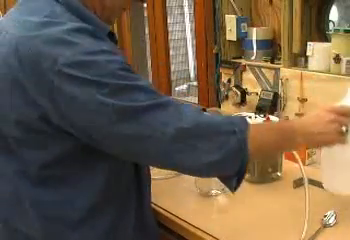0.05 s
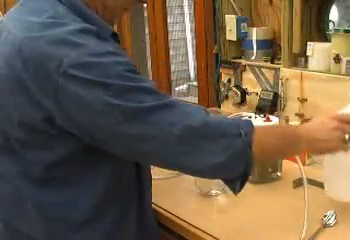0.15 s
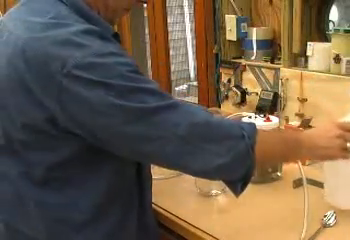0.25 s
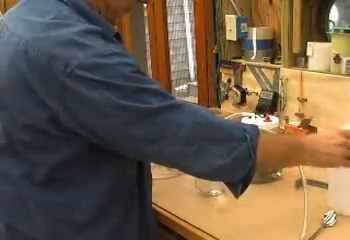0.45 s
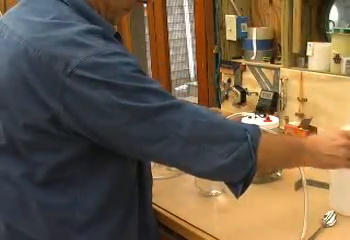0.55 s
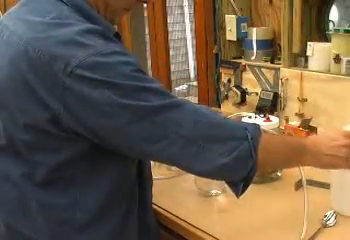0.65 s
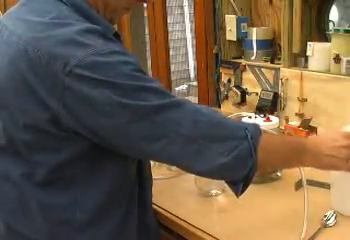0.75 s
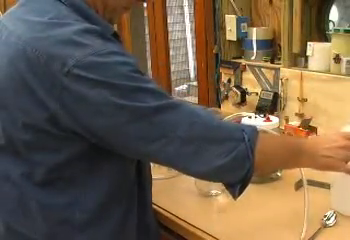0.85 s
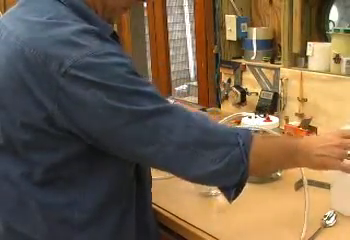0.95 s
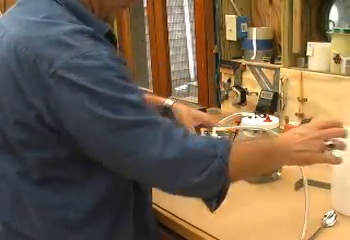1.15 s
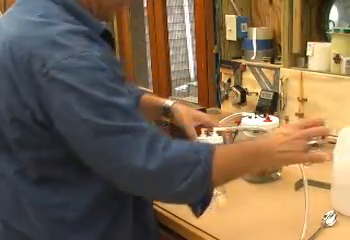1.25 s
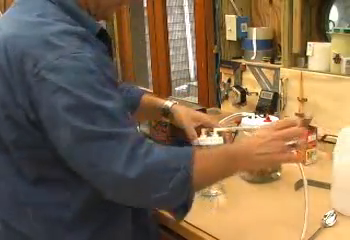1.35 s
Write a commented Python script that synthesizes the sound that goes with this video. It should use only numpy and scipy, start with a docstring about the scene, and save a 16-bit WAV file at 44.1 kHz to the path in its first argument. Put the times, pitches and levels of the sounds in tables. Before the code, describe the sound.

One hard, hollow knock sounds as a plastic jug lands on a workbench, just after a short scrape. The bench and jars ring briefly in a small workshop, then faint shuffling and finger ticks follow over low hiss.

```python
"""Over the quiet hiss and hum of a small workshop, hands tick lightly. A plastic jug scuffs on a wooden
workbench, its base rubbing and squeaking as it sticks and slips. The sound drops out for a moment.
The jug lands with a hollow thud, then a hard, bouncing knock rings the bench and the jars on it and
echoes round the room. The jug shuffles to rest with soft hollow notes, and hands tick a few more times."""
import sys
import numpy as np
from scipy import signal
from scipy.fft import rfft, irfft
from scipy.io import wavfile
from scipy.ndimage import uniform_filter1d

SR = 44100
rng = np.random.default_rng(int(sys.argv[2]) if len(sys.argv) > 2 else 0)


def unload_wav(signal):
    """Save mono or channel-first audio to the path in sys.argv[1] as 16-bit WAV at rate SR, clipped to [-1, 1]."""
    wavfile.write(
        sys.argv[1],
        SR,
        np.round(np.clip(np.atleast_2d(signal).T, -1, 1) * 32767).astype(np.int16),
    )


N = 61739
T = np.arange(N) / SR
FREQS = np.maximum(np.fft.rfftfreq(N, 1 / SR), 1)


def gain(db):
    """Turn decibels into a number to multiply by."""
    return 10 ** (np.asarray(db) / 20)


def unit(x):
    """Scale a sound to an average power of 1."""
    return x / np.sqrt(np.mean(x ** 2))


def curve(points):
    """Join (pitch_hz, level_db) points into a level for every frequency."""
    pitch_hz, level_db = np.array(points).T
    return np.interp(np.log(FREQS), np.log(pitch_hz), level_db)


def colour(x, db):
    """Turn each frequency up or down by its own number of decibels."""
    cepstrum = irfft(np.log(gain(db)), N)
    cepstrum[1:] *= 2 * (np.arange(1, N) < N / 2)  # makes the filter ring after a hit, not before
    return irfft(rfft(x) * np.exp(rfft(cepstrum)), N)


def convolve(x, response):
    """Let every sample of x set off its own copy of the response."""
    return signal.fftconvolve(np.atleast_2d(x), np.atleast_2d(response), axes=1)[:, :N]


def click(start_s):
    """The shortest possible tap: one sample."""
    return 1. * (np.arange(N) == int(start_s * SR))


def fade(fade_s, t=T):
    """Die away by 60 dB every fade_s seconds."""
    return np.exp(-np.log(1000) * np.maximum(t, 0) / max(fade_s, 1e-3))


def wander(speed_hz):
    """A smooth random wobble, about 1 in size."""
    return unit(irfft(rfft(rng.standard_normal(N)) * np.exp(-(FREQS / speed_hz) ** 2), N))


def wavering_tone(pitch_hz, share, speed_hz=70.7):
    """A pure tone that wobbles by a small share of its pitch."""
    return np.sin(2 * np.pi * np.cumsum(pitch_hz * (1 + share * wander(speed_hz))) / SR)


def ring(tones):
    """A struck object sounds several pure tones, each fading at its own speed."""
    return sum(gain(db) * np.sin(2 * np.pi * hz * T) * fade(fade_s) for hz, db, fade_s in tones)


# How strong the left-right difference is beside what both ears share: pitch_hz, level_db
STEREO_WIDTH = [(60, -10.5), (200, -13.5), (700, -11.5), (1500, -12), (4000, -10.5), (8000, -11),
                (14000, -7)]

def noise(wider_db=0):
    """Stereo hiss, a little wider in the highest treble."""
    shared, difference = rng.standard_normal((2, N))
    return shared + colour(difference, curve(STEREO_WIDTH) + wider_db) * np.array([[1], [-1]])


def burst(fade_s):
    """A dying puff of noise with a total energy of 1."""
    return unit(noise() * fade(fade_s)) / np.sqrt(N)


# Tone colour of the room's background noise: pitch_hz, level_db
AIR_COLOUR = [(15, -79), (25, -39), (66, -2.5), (121, -6.5), (154, 0.5), (207, -2), (243, -2.5), (301, -6),
              (438, -2), (604, -10), (768, -6.5), (855, -10), (1280, -10), (1860, -16), (2300, -13.5),
              (11200, -18.5), (15000, -47)]
# Low tones of the hum: pitch_hz, level_db
HUM_TONES = [(76, -81), (150.7, -75), (242.2, -66)]

def room_noise(level_db=-58.5, waver_db=1):
    """Steady background noise with a faint, wavering hum."""
    sound = gain(level_db) * unit(colour(noise(wider_db=9), curve(AIR_COLOUR)))
    for pitch_hz, hum_db in HUM_TONES:
        loudness = gain(hum_db + waver_db * wander(speed_hz=8))
        sound = sound + loudness * np.sin(2 * np.pi * (pitch_hz * T + rng.random()))
    return sound


# Light touches of the hands (more tilt is brighter): start_s, level_db, tilt_db_per_octave
HAND_TOUCHES = [(0.0587, -33.5, -5), (.096, -22.5, 2), (0.1494, -23.5, 14), (0.792, -29, 3),
                (1.212, -27.5, 11), (1.252, -25, -1)]
# Tone colour of a tick: pitch_hz, level_db
TICK_COLOUR = [(100, -18.5), (900, -5), (1800, 2.5), (2700, -2.5), (3700, -9.5), (5000, 2), (10000, -3),
               (12500, -8.5), (15500, -50)]

def hand_ticks():
    """Each touch makes a tiny snap and a short rustle."""
    snap = 0.3 * click(0)
    sound = 0
    for start_s, level_db, tilt in HAND_TOUCHES:
        colour_db = curve(TICK_COLOUR) + tilt * np.log2(FREQS / 6000)
        tick = colour(snap + burst(fade_s=0.03), colour_db)
        sound = sound + gain(level_db) * convolve(click(start_s), tick)
    return sound


# Slides of the jug on the bench: start_s, rise_s, hold_s, fade_s, low_db, middle_db, high_db
SLIDES = [(0.167, 0.0054, 0.019, 0.2, -46.5, -51.5, -61), (0.193, 0.026, 0.015, 0.035, -52, -45.5, -54),
          (0.23, 0.007, 0.019, 0.13, -49.5, -53.5, -51.5), (0.365, 0.021, 0.013, 0.5, -41.5, -38.5, -43),
          (0.589, 0.077, 0.021, 0.048, -51, -54.5, -54.5), (0.688, 0.0095, 0.0046, 0.48, -57, -73, -75)]
# Low body of the rubbing: pitch_hz, level_db
RUB_BODY = [(35, -23), (85, 2), (125, -12.5), (240, 1.5), (320, 1.5), (430, -3), (680, -3), (1200, -39.5),
            (4000, -65), (12000, -86)]
# Middle pitches where the rubbing rings: pitch_hz, width_hz, level_db
RUB_RINGS = [(702, 26, -3), (793, 260, -3.5), (1093, 100, -3), (1299, 74, -8), (1540, 180, -5.5),
             (2025, 440, -10.5)]
# High grit of the rubbing: pitch_hz, level_db
RUB_GRIT = [(300, -47), (1200, -22.5), (2600, 3), (3800, 1), (5300, 1.5), (8000, -2), (10500, -6.5),
            (12300, -20), (15000, -51.5)]

def jug_rubs():
    """Friction under the jug makes noise with a low body, a ringing middle and a gritty top."""
    friction = noise()
    peaks = sum(gain(db) / (1 + (2 * (FREQS - hz) / width_hz) ** 2) for hz, width_hz, db in RUB_RINGS)
    colours_db = curve(RUB_BODY), 20 * np.log10(peaks), curve(RUB_GRIT)
    layers = [unit(colour(friction, db)) for db in colours_db]
    sound = 0
    for start_s, rise_s, hold_s, fade_s, *levels_db in SLIDES:
        pressure = np.clip((T - start_s) / rise_s, 0, 1) * fade(fade_s, T - start_s - rise_s - hold_s)
        sound = sound + pressure * sum(gain(db) * layer for db, layer in zip(levels_db, layers))
    return sound


# Soft notes of the shifting jug: start_s, rise_s, pitch_hz, level_db, fade_s
HOLLOW_NOTES = [(.168, .014, 240, -38, .06), (.237, .004, 250, -40, .035), (.6, .016, 427, -49, .12),
                (.666, .02, 657, -44, .17), (.668, .022, 425, -42.5, .14), (.672, .014, 233, -48, .25),
                (.887, .009, 758, -58.5, .13), (1.136, .009, 758, -56, .11)]

def hollow_notes():
    """The hollow jug rings gently as it shifts; each note swells and dies away."""
    sound = 0
    for start_s, rise_s, pitch_hz, level_db, fade_s in HOLLOW_NOTES:
        swell = np.clip((T - start_s) / rise_s, 0, 1) * fade(fade_s, T - start_s - rise_s)
        sound = sound + gain(level_db) * swell * wavering_tone(pitch_hz, share=0.0183)
    return sound


# Short squeaks within the scuff: middle_s, length_s, pitch_hz, level_db
SCUFF_SQUEAKS = [(.198, .016, 780, -43), (.205, .018, 1300, -37.5), (.218, .016, 1140, -38),
                 (.221, .014, 1300, -38), (.221, .012, 1990, -41), (.231, .014, 850, -38.5)]

def jug_squeaks():
    """The dragging base sticks and slips, catching on one pitch after another."""
    sound = 0
    for middle_s, length_s, pitch_hz, level_db in SCUFF_SQUEAKS:
        swell = np.exp(-(2 * (T - middle_s) / length_s) ** 2)
        sound = sound + gain(level_db) * swell * wavering_tone(pitch_hz, share=0.024)
    return sound


# Soft landings of the jug: middle_s, level_db, length_s
LANDINGS = [(.378, -11, .001), (.3893, -1, .001), (.4005, -7, .0018)]
# Tones of the jug's hollow body: pitch_hz, level_db, fade_s
JUG_TONES = [(68, -50, 0.37), (87, -38.5, 0.04), (183.5, -36, 0.5), (255, -42, 0.17), (353, -29, 0.13),
             (448, -40.5, 0.4), (788, -40.5, 0.046), (1032, -28, 0.092)]

def jug_thud(level_db=3):
    """Each landing is a smooth, quick push that rings the hollow jug."""
    pushes = 0
    for middle_s, push_db, length_s in LANDINGS:
        bump = np.exp(-np.pi * (2 * (T - middle_s) / length_s) ** 2)
        bump_area = length_s * SR / 2
        pushes = pushes + gain(push_db) * bump / bump_area
    return gain(level_db) * convolve(pushes, ring(JUG_TONES))


# Hard bounces of the jug's base (less tilt is duller): start_s, level_db, tilt_db_per_octave
BOUNCES = [(.4299, -1, 0.5), (.432, 1.5, 0.5), (0.4368, -3.5, -1)]
# Short tones of the stiff base: pitch_hz, level_db, fade_s
BASE_TONES = [(235, -55, 0.046), (485, -37.5, 0.049), (614, -29, 0.0366), (770, -22.5, 0.043),
              (1030, -26.5, .035), (1300, -24.5, 0.044), (1510, -15, 0.011), (1670, -31.5, .035),
              (1940, -31, 0.033), (2387, -29, 0.081), (2920, -19.5, 0.023), (3390, -23, 0.016),
              (4790, -26.5, 0.018), (5180, -18, .012), (5630, -22, 0.016), (6460, -22.5, 0.018),
              (7160, -14, 0.0045), (9900, -40, 0.013), (9680, -22, 0.0097)]
# Tone colour of each hit's crack and clatter: pitch_hz, level_db
CRACK_COLOUR = [(150, -21.5), (400, -1), (750, -2.5), (1400, -2.5), (2100, -4), (2700, 0.5), (3700, -5),
                (5800, -6.5), (8200, -11), (10300, -7.5), (12000, -18), (15000, -63)]

def jug_knock(base_db=-6, crack_db=4, clatter_db=5.5, to_room_db=3.5, tilt_above_hz=980):
    """Each hard hit cracks, clatters and rings the base. Returns the direct sound and what will echo."""
    # every other tone starts by swinging the opposite way
    base = gain(base_db) * sum((-1) ** k * ring([tone]) for k, tone in enumerate(BASE_TONES))
    colour_db = curve(CRACK_COLOUR)
    direct, to_room = 0, 0
    for start_s, level_db, tilt in BOUNCES:
        blow = colour(click(start_s), level_db + tilt * np.log2(1 + FREQS / tilt_above_hz))
        crack = gain(crack_db) * burst(fade_s=0.0024)
        clatter = gain(clatter_db) * burst(fade_s=0.05)
        direct = direct + convolve(blow, base + colour(crack + clatter, colour_db))
        to_room = to_room + gain(to_room_db) * colour(blow, colour_db)
    return direct, to_room


# Tones of the bench and the jars on it: pitch_hz, level_db, fade_s
BENCH_TONES = [(92, -42, .22), (366, -43, .3), (528, -43, .3), (655, -42, .25), (738, -36.5, .33),
               (834, -44, .42), (1012, -43, .35), (1043, -36, .2), (1227, -44, .4), (1300, -41, .26),
               (1362, -34, .21), (1405, -43, .33), (1620, -37, .2), (1873, -38, .27), (2175, -47, .33),
               (2517, -38, .28), (2536, -39, .3), (2935, -39, .16), (4156, -41, .28), (5281, -42.5, .25),
               (5981, -31, .18), (7391, -48, .33), (12290, -57, .28), (12960, -53, .12)]

def bench_ring():
    """The first hard hit sets the bench and its jars ringing."""
    first_hit_s = BOUNCES[0][0]
    return convolve(click(first_hit_s), ring(BENCH_TONES))


# The workshop's echo, band by band: pitch_hz, level_db, fade_s
ECHO_BANDS = [(80.6, -0.5, 0.41), (256, 1, 0.62), (607, 2, 0.41), (1284, 5.5, 0.41), (3000, -5, 0.42),
              (6100, 2, 0.37), (9110, 0.5, .36), (13900, -8, 0.074)]

def room_echo(build_s=0.002):
    """The room's answer to a click: a wash that builds fast and dies soonest in the top treble."""
    spectrum = rfft(noise())
    centres = np.log([band[0] for band in ECHO_BANDS])
    echo = 0
    for this_band, (_, level_db, fade_s) in zip(np.eye(len(ECHO_BANDS)), ECHO_BANDS):
        band_noise = irfft(spectrum * np.interp(np.log(FREQS), centres, this_band), N)
        echo = echo + gain(level_db) * band_noise * fade(fade_s)
    return unit(echo * (1 - np.exp(-T / build_s))) / np.sqrt(N)


def scene():
    """Add up all the sounds and the room's echo."""
    knock, to_room = jug_knock()
    delay_s = np.array([[1.2e-5], [0]])  # the knock reaches the left microphone slightly later
    knock = irfft(rfft(knock) * np.exp(-2j * np.pi * FREQS * delay_s), N)
    ticks = hand_ticks()
    scuffs = jug_rubs() + jug_squeaks()
    thud = jug_thud()
    for sound, to_room_db in (ticks, -7.5), (scuffs, -9.5), (thud, -12.5):
        to_room = to_room + gain(to_room_db) * sound.mean(axis=0)
    direct = ticks + scuffs + hollow_notes() + thud + knock + bench_ring()
    return room_noise() + direct + convolve(to_room, room_echo())


# Tone colour of the microphone: pitch_hz, level_db
MIC_COLOUR = [(20, -18.5), (45, -3), (70, -1), (3000, 2), (3600, -2.5), (4200, 1.5), (12000, -2),
              (15000, 4)]
DROPOUT_START_S, DROPOUT_END_S, TOP_HZ = 0.2585, 0.3745, 14300

def record(dry):
    """The microphone thins the deep bass, the sound drops out briefly, and the top treble is cut."""
    sound_on = 1. * ((T < DROPOUT_START_S) | (T > DROPOUT_END_S))
    sound_on = uniform_filter1d(sound_on, size=100)  # soften the edges of the gap
    treble_cut = signal.ellip(8, .2, 70, TOP_HZ, fs=SR, output="sos")
    return signal.sosfilt(treble_cut, colour(dry, curve(MIC_COLOUR)) * sound_on)


dry = scene()
out = record(dry)
unload_wav(out)
```